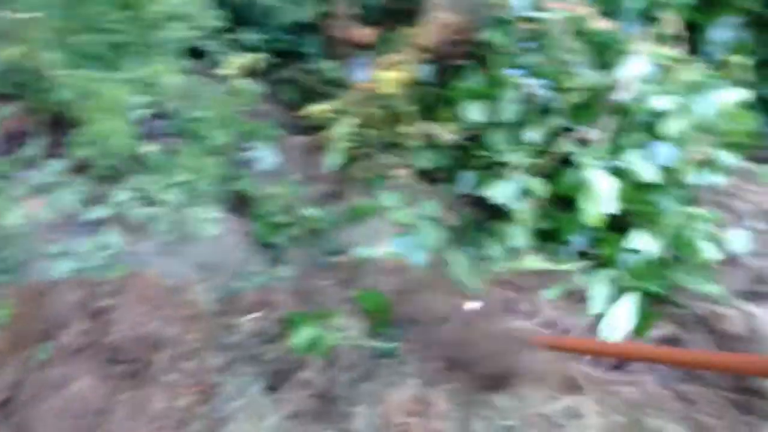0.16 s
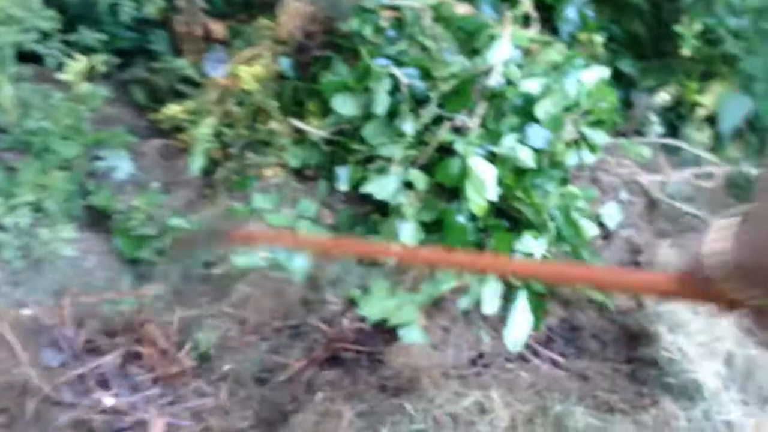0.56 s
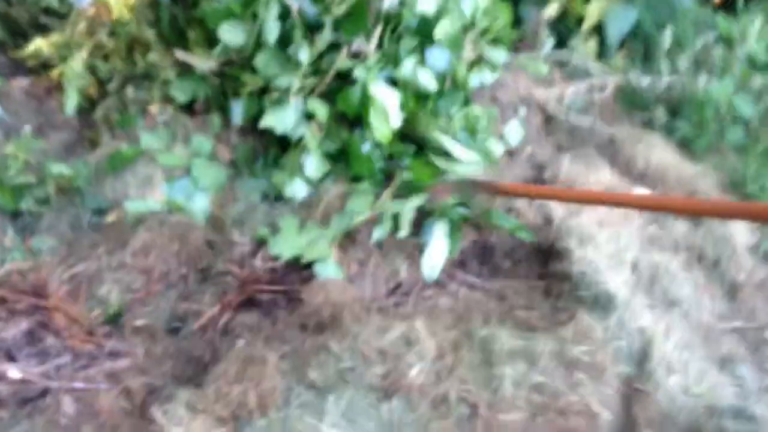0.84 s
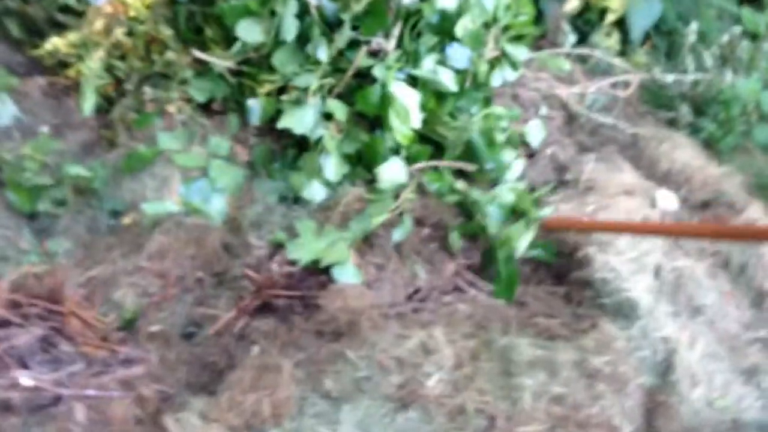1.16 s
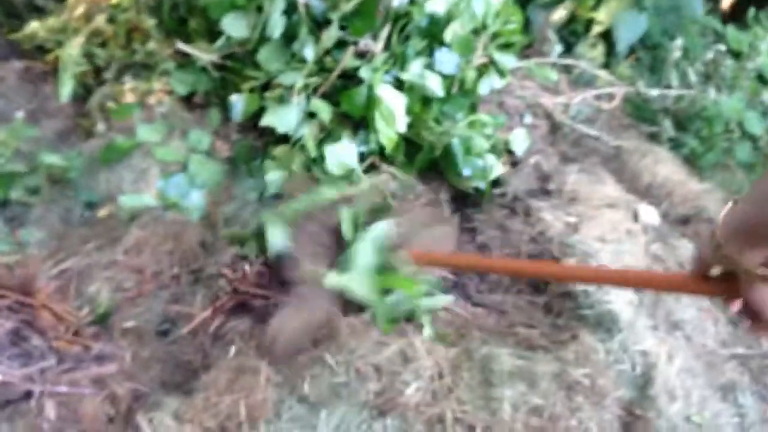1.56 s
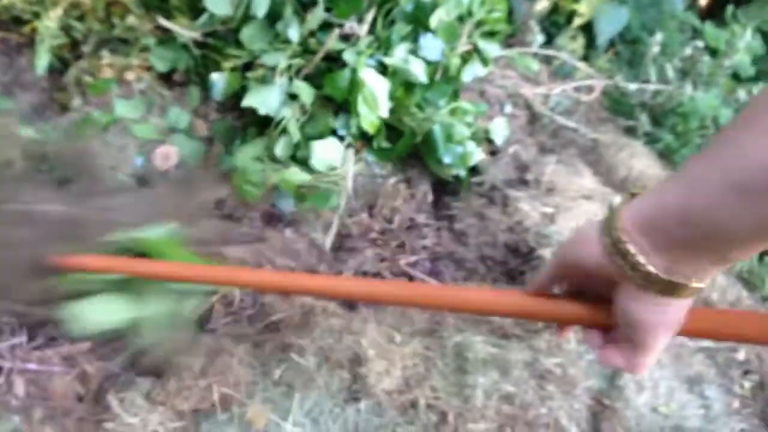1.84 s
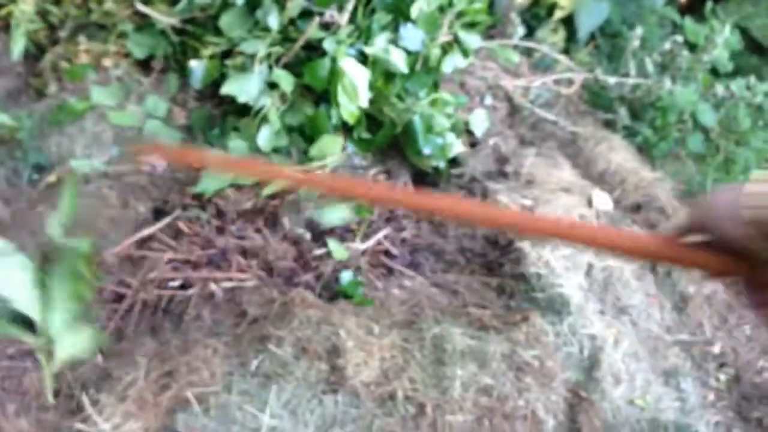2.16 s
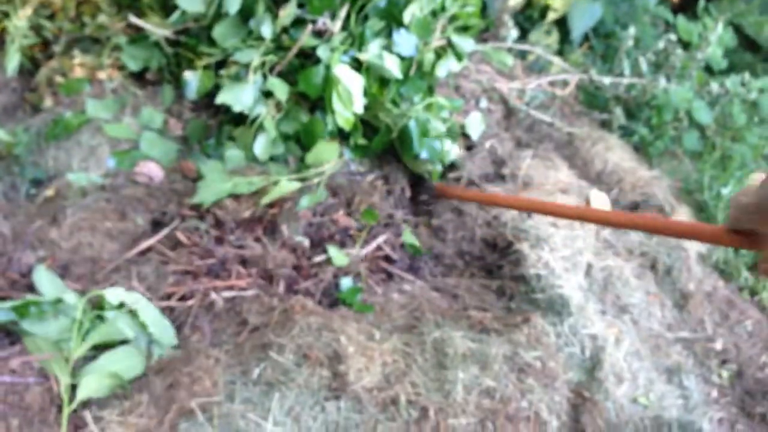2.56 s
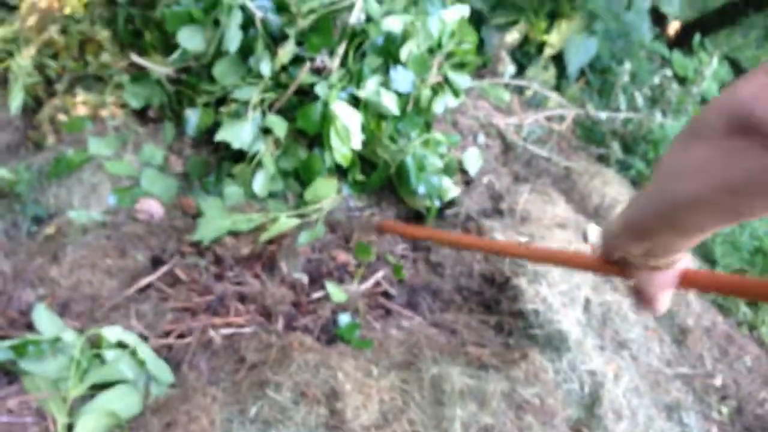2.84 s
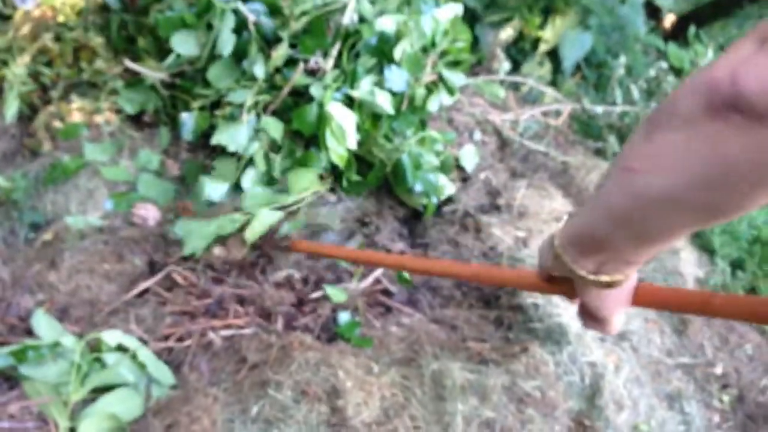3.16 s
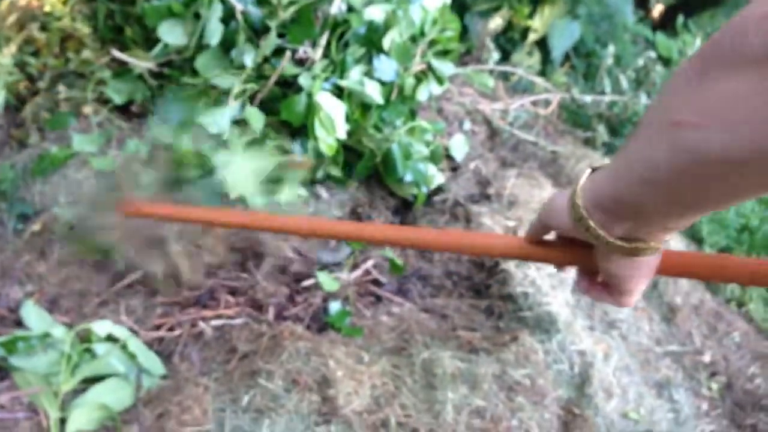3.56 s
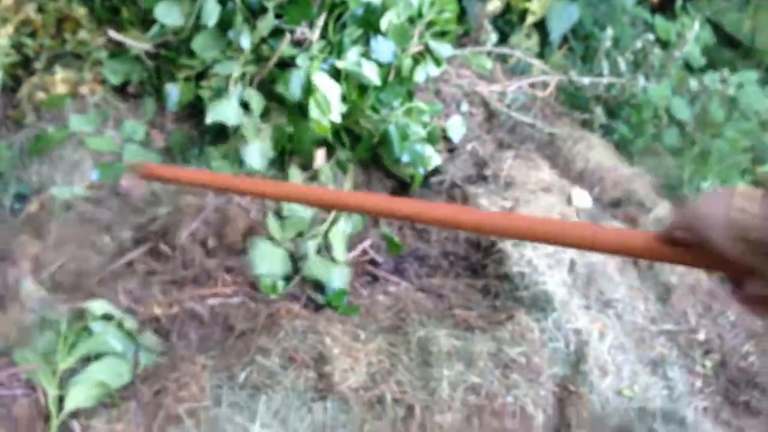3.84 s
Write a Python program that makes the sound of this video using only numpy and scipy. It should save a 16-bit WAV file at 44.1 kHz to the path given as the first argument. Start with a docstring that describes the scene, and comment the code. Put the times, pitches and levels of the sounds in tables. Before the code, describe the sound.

Close, crisp rustling of a rake pulling through leafy cuttings in a quiet garden. Several short strokes scrape the debris and snap twigs; after a lull come the loudest pulls and a hard knock on a stick, over faint rumble.

```python
"""A compost heap in a garden, the microphone close to a rake pulling through cuttings and dry stalks.
Each stroke crushes a crowd of leaves into tiny crackles and scrapes the tines through debris.
Twigs snap, stalks ring, and the rake head clacks on sticks, bumps on clods and grinds through soil.
Ground and bushes scatter a little of it back; low handling rumble and faint garden air lie beneath."""
import sys
import numpy as np
from scipy import signal
from scipy.fft import rfft, irfft
from scipy.io import wavfile
from scipy.ndimage import uniform_filter1d

SR = 44100
rng = np.random.default_rng(int(sys.argv[2]) if len(sys.argv) > 2 else 0)


def wav_record(signal):
    """Record a signal, one row per channel, as 16-bit PCM in the file named by sys.argv[1]."""
    frames = np.transpose(np.atleast_2d(signal))
    bounded = np.clip(frames, -1, 1)
    # unit amplitude maps onto the largest positive 16-bit level
    quanta = np.round(bounded * 32767).astype(np.int16)
    wavfile.write(sys.argv[1], SR, quanta)


N = 176400


def undb(db):
    """Decibels to gain."""
    return 10 ** (np.asarray(db) / 20)


def unit(x):
    """Scale to rms 1."""
    return x / np.sqrt(np.mean(x ** 2))


def peak(x):
    """Scale to peak 1."""
    return x / np.abs(x).max()


def curve(rows, column):
    """One column of a timed table, joined by straight lines."""
    rows = np.array(rows)
    return np.interp(np.arange(N) / SR, rows[:, 0], rows[:, column])


def colour(x, points, size=2048):
    """Minimum-phase filter through (Hz, dB) points, falling away below the first."""
    hz, db = np.array(points).T
    f = np.maximum(np.fft.rfftfreq(2 * size, 1 / SR), 1)
    gain = undb(np.interp(np.log(f), np.log(hz), db)) * np.minimum(f / hz[0], 1)
    cepstrum = irfft(np.log(gain))
    cepstrum[1:size] *= 2
    cepstrum[size + 1:] = 0
    impulse = irfft(np.exp(rfft(cepstrum)))[:size]
    return signal.oaconvolve(x, impulse)[:N]


def band(x, hz, octaves, order=1):
    """Band-pass around a centre."""
    edges = np.minimum(hz * 2 ** (np.array([-.5, .5]) * octaves), [SR / 2 - 2000, SR / 2 - 1000])
    return signal.sosfilt(signal.butter(order, edges, "bandpass", fs=SR, output="sos"), x)


def fade(t60):
    """An eighth of a second of decay, falling 60 dB in t60 seconds."""
    return np.exp(-np.log(1000) * np.arange(SR // 8) / SR / t60)


def ring(hz, t60):
    """One struck mode."""
    env = fade(t60)
    return env * np.sin(2 * np.pi * hz * np.arange(len(env)) / SR)


def wander(per_s):
    """Smooth random drift with rms 1."""
    hold = int(SR / per_s)
    steps = np.repeat(rng.standard_normal(N // hold + 1), hold)
    return unit(uniform_filter1d(steps, hold)[:N])


def add(out, s, x):
    """Mix a sound in at a time."""
    i = max(int(s * SR), 0)
    out[i:i + len(x)] += x[:N - i]


def grains(per_s, scatter_db, size):
    """Random tiny fractures, many weak and few strong, with steady mean power."""
    chance = np.clip(per_s / SR, 1 / SR, 1) * np.ones(size)
    draw = rng.uniform(-1, 1, size) / chance
    hit = np.abs(draw) < 1
    rarity = np.minimum(-np.log(np.abs(draw[hit])), 4.5)
    out = np.zeros(size)
    out[hit] = np.sign(draw[hit]) * undb(scatter_db * rarity) / np.sqrt(chance[hit])
    return out


# spectrum of the air around the heap (frequency [Hz], relative level [dB])
AIR_SPECTRUM = [(30, -7.5), (70, -1.5), (300, -4.5), (500, -7), (800, -6.5), (1500, -15), (4000, -14),
                (15000, -21)]
def garden_air():
    """Still garden air, a faint steady bed of noise."""
    return unit(colour(rng.standard_normal(N), AIR_SPECTRUM)) * undb(-63.2)


# rumble at the microphone (time [s], low band level [dB], upper band level [dB])
RUMBLE_LEVELS = [(0, -68, -69), (.3, -80, -66.5), (.58, -62, -66.5), (.8, -68, -70), (1.08, -62, -65.5),
                 (1.3, -66, -75), (2.5, -70, -78.5), (3.15, -67.5, -67), (3.68, -67, -74.5),
                 (3.8, -61, -71), (4, -63, -76)]
def handling_rumble():
    """Handling noise swells and sinks in two low bands."""
    low = unit(band(rng.standard_normal(N), hz=71.3, octaves=.82, order=2))
    upper = unit(band(rng.standard_normal(N), hz=172, octaves=.59, order=2))
    return low * undb(curve(RUMBLE_LEVELS, 1)) + upper * undb(curve(RUMBLE_LEVELS, 2))


def garden_scatter(near):
    """Ground and bushes return a short, diffuse tail to the microphone."""
    env = fade(t60=.11)
    echoes = rng.standard_normal(len(env)) * env
    return undb(-16) * signal.oaconvolve(near, echoes / np.linalg.norm(echoes))[:N]


SLIPS_PER_S, SLIP_SCATTER_DB = 2600, 2.4
# the rake head ploughing soft soil (start [s], length [s], level [dB])
SOIL_PLOUGHS = [(1.27, 0.82, -64.5)]
def soil():
    """Crumbs of earth grind dully ahead of the rake head."""
    out = np.zeros(N)
    for s, length, db in SOIL_PLOUGHS:
        along = np.linspace(0, 1, int(length * SR))
        slips = grains(SLIPS_PER_S, SLIP_SCATTER_DB, len(along))
        crumbs = unit(band(slips, hz=1010, octaves=2.25, order=2))
        swell = np.sqrt(np.abs(np.sin(np.pi * along)))
        add(out, s, undb(db) * swell * crumbs)
    return out


# the rake head meeting clods (time [s], peak level [dB], pitch [Hz], t60 [s])
CLOD_BUMPS = [(.132, -47.5, 155, .08), (.286, -47.5, 170, .08), (.4478, -38, 790, 0.0083),
              (.7836, -47.5, 500, .017), (1.597, -41.5, 1310, 0.0054), (3.026, -45, 774, 0.013),
              (3.745, -50.5, 70, .1)]
def clod_bumps():
    """Soft ground answers with a damped thud and a puff of crumbs."""
    out = np.zeros(N)
    for s, db, hz, t60 in CLOD_BUMPS:
        env = fade(t60)
        crumbs = peak(band(rng.standard_normal(len(env)) * env, hz, octaves=1.54))
        thud = band(ring(hz, t60) + .5 * crumbs, hz, octaves=1.4)
        add(out, s, undb(db) * peak(thud))
    return out


# dry stalks flicked by the tines (time [s], peak level [dB], pitch [Hz])
STALK_FLICKS = [(.2777, -43, 1800), (1.07, -44.5, 2560), (1.0905, -45.5, 2490), (3.642, -43.5, 1925)]
def stalk_flicks():
    """A flicked dry stalk rings briefly on one woody note."""
    out = np.zeros(N)
    for s, db, hz in STALK_FLICKS:
        add(out, s, undb(db) * ring(hz, t60=.027))
    return out


# gliding resonances (start [s], length [s], level [dB], first pitch [Hz], last pitch [Hz], width [Hz])
SINKING_RESONANCES = [(.15, .27, -51.5, 4870, 2900, 700), (.16, 1.3, -74, 2520, 2230, 130),
                      (1.52, 0.54, -59.5, 4500, 3000, 800), (3.209, .1, -58, 2300, 2000, 300)]
def sinking_resonances():
    """Three short swishes fall in pitch; a faint, narrow ring near 2.4 kHz sinks slowly."""
    out = np.zeros(N)
    for s, length, db, first_hz, last_hz, width_hz in SINKING_RESONANCES:
        damping = np.exp(-np.pi * width_hz / SR)
        along = np.linspace(0, 1, int(length * SR))
        ticks = grains(SLIPS_PER_S, SLIP_SCATTER_DB, len(along))
        hz = first_hz + (last_hz - first_hz) * along
        phasor = np.exp(2j * np.pi * np.cumsum(hz) / SR)
        gliding_mode = (phasor * signal.lfilter([1], [1, -damping], ticks / phasor)).real
        add(out, s, undb(db) * np.sin(np.pi * along) * unit(gliding_mode))
    return out


# modes of the rake head (frequency [Hz], relative level [dB], t60 [s])
RAKE_MODES = [(1470, 3, .036), (1595, 0, .04), (1990, -6, .025), (2300, -5, .035), (2820, -5.5, .035),
              (3430, -1.5, 0.046), (3940, 1.5, 0.044), (4210, -1.5, .025)]
def rake_head():
    """The ring of the tines; each contact stirs the modes differently."""
    modes = (undb(db + 2 * rng.standard_normal()) * rng.choice([-1, 1]) * ring(hz, t60)
             for hz, db, t60 in RAKE_MODES)
    return peak(sum(modes))


STICK_HZ, DISPERSION_S = 1000, .00056
# the rake striking sticks (time [s], contact peak [dB], first pitch [Hz], relative head ring [dB])
STICK_CLACKS = [(0.8319, -34, 6200, -1), (.9333, -32.5, 6000, 3.5), (3.4354, -16, 5700, -17),
                (3.6523, -40, 4040, -4), (3.85, -43, 4500, -8)]
def stick_clacks():
    """A hard contact sends bending waves along the rake handle, whose highs arrive before its lows; then the
    rake head rings."""
    out = np.zeros(N)
    env = fade(t60=.0035) - fade(t60=.0011)  # the faster fade shapes the attack
    sinking = np.exp(-np.arange(len(env)) / SR / DISPERSION_S)
    for s, db, first_hz, head_db in STICK_CLACKS:
        hz = STICK_HZ + (first_hz - STICK_HZ) * sinking
        contact = env * np.sin(2 * np.pi * np.cumsum(hz) / SR)
        add(out, s, undb(db) * (peak(contact) + undb(head_db) * rake_head()))
    return out


# twigs and stems breaking (time [s], peak level [dB], pitch [Hz], t60 [ms], relative splinters [dB])
TWIG_SNAPS = [(0.0709, -24.5, 4500, 1.3, -17), (.1367, -28.5, 5200, 2.5, -5),
              (0.7834, -32.5, 5700, 0.2, -13), (0.918, -34, 3500, 8, -7), (.984, -34, 4500, 2, -11),
              (1.0554, -36, 3800, 1, -10), (1.0698, -30, 3730, 1, -10), (1.0903, -34.5, 3120, 1, -4),
              (1.455, -30.5, 7000, 0.5, -9), (1.5968, -22.5, 5600, 0.5, -6),
              (2.3649, -34.5, 5700, 1.5, -12), (2.47, -43, 6000, 3, -8), (2.7354, -40, 5800, 1, -8),
              (3.0184, -24, 6200, 0.5, -12), (2.9874, -23.5, 4170, 6, -9), (3.0062, -23, 6200, 1, -13),
              (3.024, -22, 5800, 1, -12), (3.0851, -27, 8200, 2, -13), (3.155, -26, 7750, 7, -12),
              (3.1657, -25.5, 5730, 2, -15), (3.2276, -23.5, 6400, 2, -10), (3.3365, -28.5, 6700, 1, -10),
              (3.5015, -14.5, 5040, 6.5, -2.5), (3.5237, -22, 3930, 9.5, -8), (3.5568, -26.5, 4430, 2, -10),
              (3.6418, -28.5, 6000, 2.3, -10)]
def twig_snaps():
    """A stem breaks with a short ping and a spray of splinters; it is too thin to radiate lows."""
    out = np.zeros(N)
    env = fade(t60=.021)
    for s, db, hz, ring_ms, splinter_db in TWIG_SNAPS:
        fractures = grains(per_s=12000, scatter_db=3, size=len(env)) * env
        splinters = band(fractures, 1.13 * hz, octaves=1.8)
        crack = peak(ring(hz, ring_ms / 1000)) + undb(splinter_db) * peak(splinters)
        add(out, s, undb(db) * peak(band(crack, 1.2 * hz, octaves=2.37, order=2)))
    return out


SCRAPE_FLUTTER_DB, TINE_RING_DB = 2.5, -12.5
# spectrum of tines scraping close by (frequency [Hz], relative level [dB])
SCRAPE_SPECTRUM = [(300, -7.5), (700, -8.5), (1100, -5), (1500, -4), (1750, -5.5), (2200, 1), (2750, -3),
                   (3700, -1), (6500, -9.5), (15000, -26)]
def tine_scrape(db):
    """Tines catch and slip in soil and stalks, and ring faintly."""
    slips = grains(SLIPS_PER_S, SLIP_SCATTER_DB, N) * undb(SCRAPE_FLUTTER_DB * wander(per_s=60))
    tines = unit(signal.oaconvolve(slips, rake_head())[:N])
    grit = unit(colour(slips, SCRAPE_SPECTRUM))
    return unit(grit + undb(TINE_RING_DB) * tines) * undb(db)


LEAF_GRAINS_PER_S, LEAF_SCATTER_DB, LEAF_FLUTTER_DB, LEAF_HISS_DB = 5500, 2.5, .83, -2
CROWDING_DB = 36  # a stroke this much louder breaks ten times as many fibres
# spectrum of leaves crackling close by (frequency [Hz], relative level [dB])
LEAF_SPECTRUM = [(400, -18.5), (950, -16), (1500, -17.5), (2300, -12), (2750, -12), (3200, -3.5),
                 (4200, -1.5), (7000, 0.5), (9000, -2), (12000, -7), (15500, -10.5)]
def leaf_rustle(db):
    """Leaves of many sizes crackle, denser under a harder pull, over the hiss of leaf sliding on leaf."""
    per_s = LEAF_GRAINS_PER_S * 10 ** ((db - db.mean()) / CROWDING_DB)
    bands_hz = np.geomspace(700, 14000, 9)
    crackle = np.zeros(N)
    for hz in bands_hz:
        fractures = grains(per_s / len(bands_hz), LEAF_SCATTER_DB, N)
        flutter = undb(LEAF_FLUTTER_DB * wander(per_s=45))
        crackle += np.sqrt(hz) * unit(band(fractures, hz, octaves=.91, order=2)) * flutter
    rustle = unit(crackle) + undb(LEAF_HISS_DB) * rng.standard_normal(N)
    return unit(colour(rustle, LEAF_SPECTRUM)) * undb(db + LEAF_FLUTTER_DB * wander(per_s=90))


# whole leaves crumpling, and the splintery bounce of the clack at 0.93 s (time [s], peak level [dB], t60 [s])
LEAF_CRUMPLES = [(.933, -37, 0.059), (1.7392, -23.5, .055), (2.186, -39, .055), (2.7005, -36.5, 0.039),
                 (2.9825, -28, .04)]
def leaf_crumples():
    """A leaf gives way all at once, or a struck stick splinters, in a dense burst of fractures."""
    out = np.zeros(N)
    for s, db, t60 in LEAF_CRUMPLES:
        env = fade(t60) - fade(t60=.001)
        burst = grains(LEAF_GRAINS_PER_S, LEAF_SCATTER_DB / 2, len(env)) * env
        add(out, s, undb(db) * peak(colour(burst, LEAF_SPECTRUM)))
    return out


# strokes over the heap, in order (time [s], rustle level [dB], scrape level [dB])
REACH_OUT = [(0, -55, -60), (.055, -57.5, -64), (.11, -49, -59), (.18, -43.5, -56), (.28, -47.5, -54.5),
             (.36, -50.5, -62), (.48, -54, -63), (.57, -63.5, -69.5), (.76, -69, -71)]
DIG_IN = [(.81, -60, -64), (.89, -57.5, -55.5), (.99, -52, -55.5), (1.04, -56, -62), (1.1, -59, -59.5),
          (1.17, -67, -70), (1.26, -66, -68)]
PULL_BACK = [(1.3, -58, -62), (1.366, -47.5, -55), (1.46, -56.5, -68), (1.58, -46.5, -55),
             (1.69, -47.5, -57), (1.75, -44, -56.5), (1.8, -48.5, -59.5), (1.94, -48.5, -58),
             (2.04, -58.5, -66)]
SHAKE_LOOSE = [(2.08, -54.5, -60), (2.14, -61.5, -67), (2.19, -57, -66), (2.25, -61.5, -69),
               (2.33, -57, -63.5), (2.41, -62, -69), (2.52, -68.5, -80), (2.66, -69.5, -75)]
GATHER_UP = [(2.705, -55.5, -72), (2.75, -58, -63.5), (2.84, -61, -71), (2.91, -52.5, -53.5),
             (2.974, -46.5, -59), (2.99, -37.5, -52), (3.04, -39.5, -56), (3.12, -49, -62.5)]
TUG_FREE = [(3.17, -44, -62), (3.22, -48.5, -63), (3.235, -41.5, -60), (3.285, -50, -53.5),
            (3.315, -57.5, -69), (3.375, -54.5, -66)]
FLING_OVER = [(3.42, -46, -62), (3.45, -39.5, -51), (3.485, -42, -55), (3.51, -36, -48.5),
              (3.533, -34.5, -58), (3.575, -46.5, -63), (3.62, -54.5, -63), (3.655, -50, -53),
              (3.7, -57.5, -69)]
SETTLE_DOWN = [(3.74, -58.5, -68), (3.85, -55, -63), (3.97, -64.5, -77)]
def rake_strokes():
    """Close to the microphone, each stroke crushes leaves and drags the tines through debris."""
    strokes = (REACH_OUT + DIG_IN + PULL_BACK + SHAKE_LOOSE
               + GATHER_UP + TUG_FREE + FLING_OVER + SETTLE_DOWN)
    return leaf_rustle(curve(strokes, 1)) + tine_scrape(curve(strokes, 2))


def scene():
    """The rake up close and the garden behind it, in mono."""
    near = rake_strokes() + sinking_resonances() + soil() + leaf_crumples()
    near += twig_snaps() + stalk_flicks() + stick_clacks() + clod_bumps()
    return (near + garden_scatter(near) + handling_rumble() + garden_air())[None]


def record(dry, top_hz=15550):
    """The microphone cuts the top steeply."""
    return signal.sosfilt(signal.ellip(10, .2, 70, top_hz, fs=SR, output="sos"), dry)


dry = scene()
out = record(dry)
wav_record(out)
```